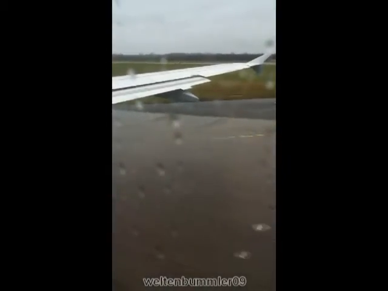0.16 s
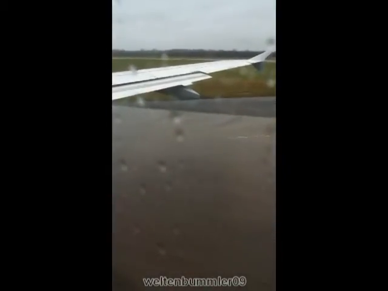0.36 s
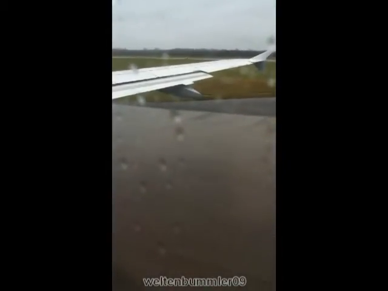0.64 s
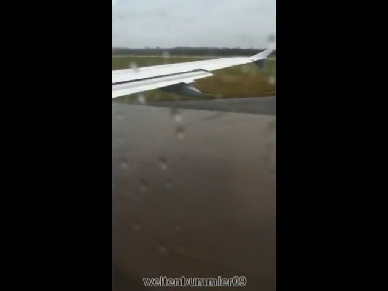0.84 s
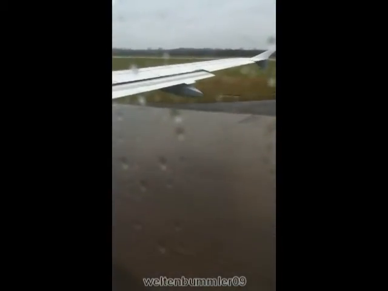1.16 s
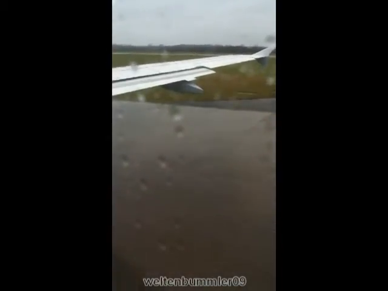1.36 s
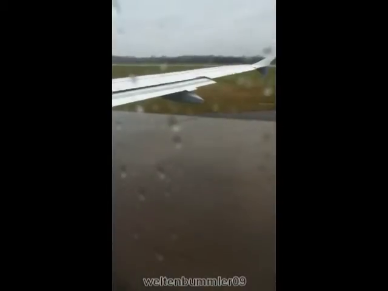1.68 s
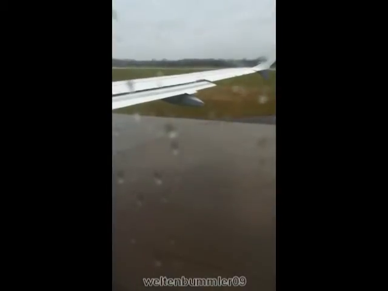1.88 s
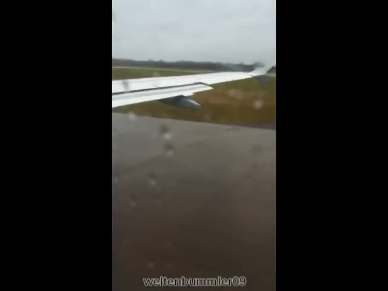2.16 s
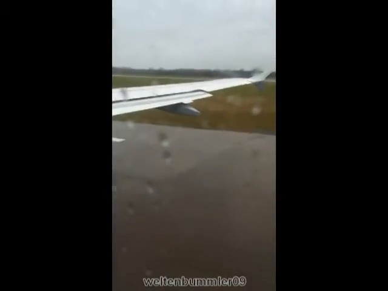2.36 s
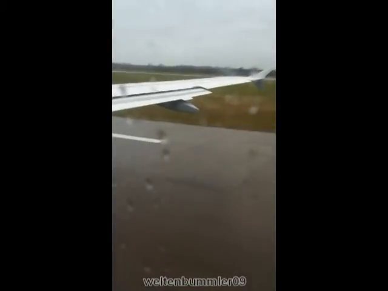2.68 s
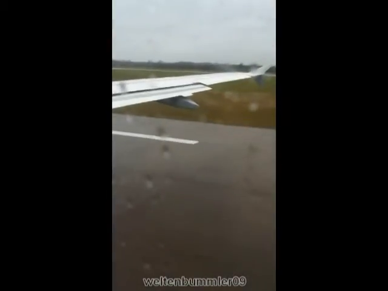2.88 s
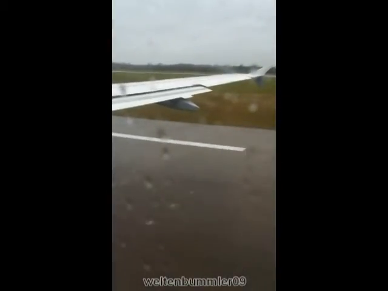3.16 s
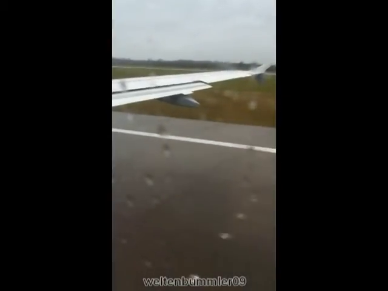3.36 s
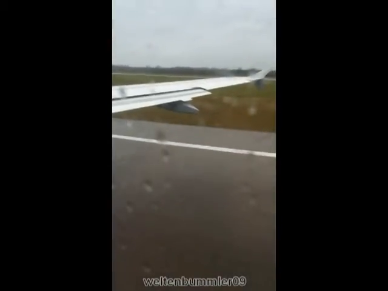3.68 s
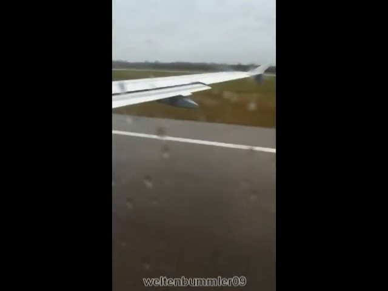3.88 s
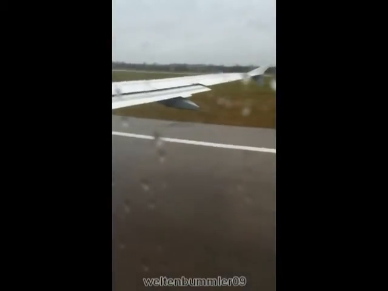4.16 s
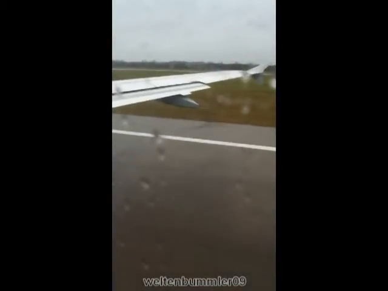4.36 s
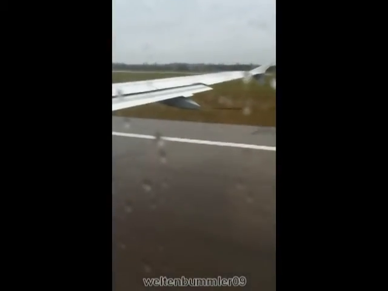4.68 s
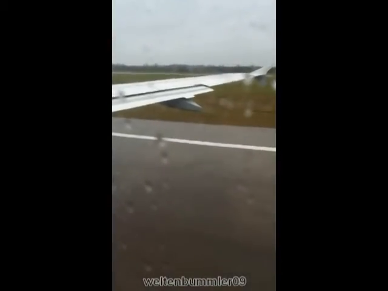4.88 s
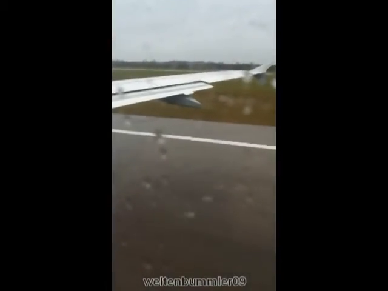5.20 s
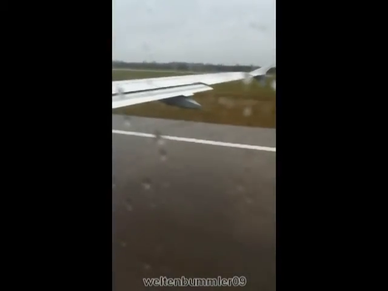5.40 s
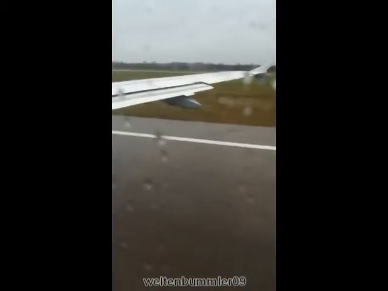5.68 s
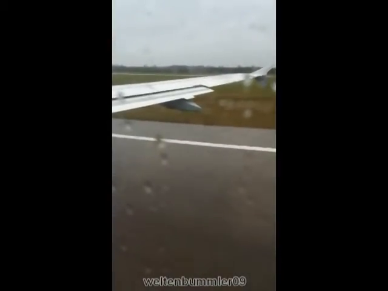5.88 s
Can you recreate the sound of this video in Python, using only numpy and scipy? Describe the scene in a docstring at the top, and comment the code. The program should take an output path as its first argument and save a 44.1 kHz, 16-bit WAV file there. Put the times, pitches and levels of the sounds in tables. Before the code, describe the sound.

Inside an airliner cabin, jet fans whine upward as a deep boom and roar build, then hold while wheels thud and trim rattles.

```python
"""An airliner starts its takeoff roll, heard at a window seat behind the wing.
At first a thin electrical whistle and vent air are clear around the idling fans.
The fans whine upward while boom, roar, air hiss and trim rattle rise for 1.3 seconds; scuffs join in.
From about two seconds wheel bumps thud and the trim ticks; the fans settle and the noise swells and sags.
Shaped noise makes the roar, boom and air, smeared tones the fans, steady tones the whistle."""
import sys
import numpy as np
from scipy import signal
from scipy.fft import rfft, irfft
from scipy.io import wavfile
from scipy.ndimage import uniform_filter1d, minimum_filter1d

SR = 44100
rng = np.random.default_rng(int(sys.argv[2]) if len(sys.argv) > 2 else 0)


def bounce(signal):
    """Save signal as a 16-bit WAV file at the path given by the first command-line argument."""
    frames = np.transpose(np.atleast_2d(signal))
    limited = np.clip(frames, -1, 1)
    pcm = np.round(limited * 32767).astype(np.int16)
    wavfile.write(sys.argv[1], SR, pcm)


N = 266364
TIME = np.arange(N) / SR  # s
BINS = np.maximum(np.arange(N // 2 + 1) * SR / N, 1)  # Hz

# slow swell and sag that several noise layers share: t/s, level change/dB
SWELL = [(1.0, 0), (1.7, 1.2), (1.95, -0.5), (2.3, -2), (2.55, -0.5), (3.0, 1.2), (3.35, -1.4), (3.7, 1.8),
         (3.95, 1), (4.3, -2), (4.6, -.2), (4.95, -1), (5.25, 0.5), (6.0, -1)]
# wheels passing over bumps: t/s, relative level/dB
BUMPS = [(2.13, -36), (3.123, -35), (3.898, -42), (4.01, -42), (4.816, -42), (5.483, -40), (5.841, -38)]


def undb(db):
    """Decibels to gain."""
    return 10 ** (np.asarray(db) / 20)


def curve(rows):
    """(s, value) rows joined by straight lines in time."""
    return np.interp(TIME, *np.transpose(rows))


def unit(x):
    """Scale to rms 1."""
    return x / np.sqrt(np.mean(x ** 2))


def colour(points):
    """Gain at every frequency from (Hz, dB) points; silent above the last one."""
    hz, db = np.transpose(points)
    gain = undb(np.interp(np.log(BINS), np.log(hz), db))
    return np.where(BINS <= hz[-1], gain, 0)


def resonance(hz, width):
    """Response of one damped resonance, gain 1 at its centre; both arguments in Hz."""
    return 1 / (1 + 1j * (BINS ** 2 - hz ** 2) / (BINS * width))


def filtered(x, response):
    """Pass a sound through a frequency response."""
    return irfft(rfft(x) * response, N)


def noise(response):
    """Random noise of rms 1 with the given response."""
    return unit(filtered(rng.standard_normal(N), response))


def even(x, seconds):
    """Take the slow swells out of a noise and keep its quick flutter."""
    size = max(int(seconds * SR), 2)
    power = uniform_filter1d(uniform_filter1d(x ** 2, size), size // 2)
    return x / np.sqrt(power + 1e-9)


def walk(rate):
    """Random wander of rms 1 that swings about rate times a second."""
    steps = 2 * rate * TIME
    knots = rng.standard_normal(int(steps[-1]) + 2)
    return unit(np.interp(steps, np.arange(len(knots)), knots))


def burst(start, rise_s, decay_s):
    """Envelope of a contact: a quick rise and an exponential fall."""
    age = np.maximum(TIME - start, 0)
    return (1 - np.exp(-age / rise_s)) * np.exp(-age / decay_s)


def opening_rise(start_db, swell=1.):
    """Gain that rises from start_db over the first 1.32 s, then levels off, plus a share of the swell."""
    rise_s = 1.32
    still_to_rise = np.clip(1 - TIME / rise_s, 0, 1)
    return undb(start_db * still_to_rise + swell * curve(SWELL))


def cabin_boom(db=-12, start_db=-6, throb_s=.17, loud_s=0.031):
    """The exhaust shakes the fuselage; the cabin air answers in low resonances that throb unevenly."""
    # resonances of the cabin air: f/Hz, width/Hz, relative level/dB
    cabin_modes = [(146, 39.4, -11.5), (160.8, 24, -7), (175.6, 14.8, -1.5), (207.1, 17.9, -5)]
    # moments when the boom's random throb is louder: t/s, lift/dB
    loud_moments = [(.68, 5), (1.13, 2), (1.4, 2), (1.85, 4), (2.119, 6.5), (2.86, 3), (2.98, 3.5),
                    (3.32, 5), (3.47, 6), (4.19, 6), (4.59, 5), (4.83, 4.5), (5.42, 2.5), (5.52, 6.5)]
    # the fourth power in energy: each resonance acts twice in a row
    power = sum(undb(mode_db) ** 2 * abs(resonance(hz, width)) ** 4 for hz, width, mode_db in cabin_modes)
    boom = even(noise(np.sqrt(power)), throb_s)
    throb_db = sum(lift_db * np.exp(-((TIME - peak) / loud_s) ** 2) for peak, lift_db in loud_moments)
    return boom * undb(db + throb_db) * opening_rise(start_db, swell=0.98)


def exhaust(db=-13.5, start_db=-9, flutter_s=0.23, buffet_db=1., buffet_hz=8):
    """Jet mixing noise arrives in buffets, dulled by the wall and lifted where its panels resonate."""
    # roar through the wall, before the panels lift it: f/Hz, relative level/dB per Hz
    roar_spectrum = [(60, -37), (120, -43), (190, -5), (235, 0.5), (300, -2.5), (375, -11.5), (460, -13.5),
                     (600, -22), (850, -30.5), (1200, -36), (1700, -41), (2600, -55), (6000, -74.5)]
    # wall panel resonances: f/Hz, width/Hz, lift/dB
    panel_modes = [(264.9, 16, 4.5), (337, 36.5, 6), (392.4, 14, 3.5), (456.6, 17, 5), (530, 80, 4.5),
                   (656, 12, 5), (724, 64, 2.5), (980, 34, 2), (1255, 35, 6.5)]
    lift_db = sum(mode_db * abs(resonance(hz, width)) ** 2 for hz, width, mode_db in panel_modes)
    roar = even(noise(colour(roar_spectrum) * undb(lift_db)), flutter_s)
    return roar * undb(db + buffet_db * walk(buffet_hz)) * opening_rise(start_db)


def fans(core_hz=14, haystack_hz=130, haystack_db=-4, db=-1):
    """Blade-passing tones; turbulent inflow smears each into a core and a skirt, more so for higher harmonics."""
    # fan spool-up: t/s, blade-passing f/Hz
    spool_up = [(0, 1550), (.4, 1580), (.85, 1732), (1.6, 2095), (2.15, 2370), (2.45, 2468), (3.2, 2560),
                (4.2, 2575), (6.04, 2578)]
    # harmonics from the first up, relative: idle level/dB, mid spool-up level/dB, takeoff level/dB
    harmonics = [(-59.5, -53.5, -56), (-56, -57.5, -67), (-69.5, -59.5, -67.5)]
    stage_hz = [1550, 2240, 2430]  # blade-passing rates of idle, mid spool-up and takeoff
    blade_hz = curve(spool_up)
    phase = 2 * np.pi * np.cumsum(blade_hz) / SR
    out = 0
    for k, stages_db in enumerate(harmonics, 1):
        # two independent wanders, for the cosine and the sine part
        inflow = []
        for _ in range(2):
            core = walk(k * core_hz)
            skirt = k * undb(haystack_db) * walk(k * haystack_hz)
            inflow.append(core + skirt)
        tone = inflow[0] * np.cos(k * phase) + inflow[1] * np.sin(k * phase)
        out = out + unit(tone) * undb(np.interp(blade_hz, stage_hz, stages_db))
    return out * undb(db)


def wheels(db=-28.0, start_db=-11, thud_hz=36, thud_s=0.013, thud_db=2):
    """Tyres rumble through the landing gear; each bump gives a short, deep thud."""
    # tyre rumble: f/Hz, relative level/dB per Hz
    roll_spectrum = [(15, -38.5), (30, -29.5), (48, -17.5), (62, -6), (80, 3.5), (104, 12.5), (125, 2),
                     (180, -30.5), (400, -54)]
    out = even(noise(colour(roll_spectrum)), 0.33) * undb(db) * opening_rise(start_db, swell=1.8)
    for start, bump_db in BUMPS:
        age = np.maximum(TIME - start, 0)
        swing = age / thud_s * np.exp(1 - age / thud_s)  # reaches 1 after thud_s
        out = out + undb(bump_db + thud_db) * swing * np.sin(2 * np.pi * thud_hz * age)
    return out


def rattle(rate=1100, decay_s=0.0019, db=-52, standstill_db=-16, awake_s=1.3, bunch_db=2.5, jolt=0.42,
           jolt_s=0.05):
    """Many small trim contacts a second, bunched by the shaking airframe; speed wakes them and bumps jolt them."""
    # bright chatter of the trim: f/Hz, relative level/dB per Hz
    rattle_spectrum = [(300, -23.5), (1000, -10), (2800, 7), (4300, 1.5), (5500, 2), (8000, -1),
                       (10500, -5.5), (13000, -14), (16000, -19)]
    sizes = undb(2.6 * np.minimum(rng.exponential(size=N), 4))
    hits = (rng.random(N) < rate / SR) * sizes
    # each contact leaves a short noisy ring
    energy = signal.lfilter([1], [1, -np.exp(-2 / (decay_s * SR))], hits ** 2)
    chatter = filtered(np.sqrt(energy) * rng.standard_normal(N), colour(rattle_spectrum))
    shaking_db = bunch_db * (walk(30) + walk(8))
    bunched = even(chatter * undb(shaking_db), .25)
    waking = np.clip(TIME / awake_s, 0, 1)
    jolts = 1 + jolt * sum(burst(start, .005, jolt_s) for start, _ in BUMPS)
    return bunched * jolts * undb(db + standstill_db * (1 - waking) + curve(SWELL))


def ticks(decay_s=0.0022, db=0.5):
    """A loose plastic panel knocks against its seat and rings in a few broad bright modes."""
    # sharp knocks: t/s, relative level/dB
    knocks = [(2.3371, -37), (2.39, -38), (2.6459, -39), (2.804, -36), (3.0515, -37), (3.228, -40),
              (3.3287, -33), (3.4155, -33.5), (3.6666, -36), (3.815, -37), (3.9005, -37), (4.0692, -37),
              (4.1829, -44), (4.3237, -38), (4.9696, -41), (5.4777, -34), (5.5485, -39)]
    # ringing of the plastic trim: f/Hz, width/Hz, relative level/dB
    trim_modes = [(3420, 1400, 4.5), (5170, 1400, 0), (7750, 820, 3.5), (9400, 900, -9.5),
                  (13000, 2000, -18)]
    blows = sum(undb(knock_db) * burst(start, .0002, decay_s) for start, knock_db in knocks)
    body = sum(undb(mode_db) ** 2 * abs(resonance(hz, width)) ** 2 for hz, width, mode_db in trim_modes)
    return blows * noise(np.sqrt(body)) * undb(db)


def scuffs(db=1, rise_s=.0012, decay_s=.013):
    """Surfaces slip briefly against each other with a bright hiss."""
    # short slips: t/s, relative level/dB
    slip_times = [(.9, -47), (1.23, -49), (1.351, -42), (1.757, -37), (2.07, -45), (2.157, -44),
                  (2.544, -39), (3.53, -47.5), (3.62, -44), (4.025, -46), (4.785, -48)]
    # hiss of a slip: f/Hz, relative level/dB per Hz
    scuff_spectrum = [(1500, -5), (4000, 6), (7000, -4), (9300, 5), (11500, -8.5), (16000, -9.5)]
    slips = sum(undb(slip_db) * burst(start, rise_s, decay_s) for start, slip_db in slip_times)
    return slips * noise(colour(scuff_spectrum)) * undb(db)


def slipstream(db=-35, growth_db_per_s=3):
    """Airflow round the fuselage: a mid-range rush that grows as the aircraft gathers speed."""
    # rush along the fuselage: f/Hz, relative level/dB per Hz
    slipstream_spectrum = [(200, -6), (450, 0), (700, 3), (900, -11), (1300, -14.5), (2500, -30)]
    # db applies at the end, before the swell
    growth_db = growth_db_per_s * (TIME - TIME[-1])
    return noise(colour(slipstream_spectrum)) * undb(db + growth_db + curve(SWELL))


def air(db=-47, start_db=-2.5, vent_db=-31):
    """Hiss of air along the skin, over the steady rush of the cabin vents."""
    # hiss along the skin: f/Hz, relative level/dB per Hz
    air_spectrum = [(800, -13.5), (1700, 4), (2250, 4), (2680, 5.5), (2950, 0.5), (3250, 3), (3800, 0.5),
                    (4250, -5), (5500, -7.5), (8000, -8.5), (10500, -13.5), (13000, -19), (16000, -26)]
    # cabin vents: f/Hz, relative level/dB per Hz
    vent_spectrum = [(40, -36), (110, -13.5), (180, 10), (330, 5.5), (450, -6.5), (680, -1.5), (820, -13.5),
                     (980, -4), (1150, -13.5), (2000, -24.5), (4000, -48)]
    hiss = noise(colour(air_spectrum)) * undb(db) * opening_rise(start_db, swell=1.3)
    vents = noise(colour(vent_spectrum)) * undb(vent_db)
    return hiss + vents


def whistle(supply_hz=400.56):
    """Thin electrical whistles on harmonics of one supply; they waver, and sink between 1.1 and 2.2 s."""
    # whistle lines: multiple of the supply frequency, rms level/dB before the waver and the fade
    lines = [(12, -73), (14, -74), (16, -69), (20, -75), (22, -73), (28, -80), (30, -80), (32, -72),
             (34, -80), (38, -82)]
    out = 0
    for k, line_db in lines:
        tone = np.sin(2 * np.pi * (k * supply_hz * TIME + rng.random()))
        out = out + undb(line_db + walk(3)) * tone
    fade_db = np.interp(TIME, [1.1, 2.2], [0, -6])
    return np.sqrt(2) * out * undb(fade_db)  # root two turns rms into sine peak


def scene():
    """Everything that reaches the window seat, as one channel."""
    engines = cabin_boom() + exhaust() + fans()
    airflow = air() + slipstream()
    runway_and_trim = wheels() + rattle() + ticks() + scuffs()
    return (engines + airflow + runway_and_trim + whistle())[None]


def record(dry):
    """At the microphone a look-ahead limiter holds peaks at full scale, then a steep low-pass cuts the top."""
    top_hz = 15600
    size = SR // 100  # 10 ms
    headroom = 1 / np.maximum(abs(dry), 1)
    lowest = minimum_filter1d(headroom, 2 * size)
    gain = uniform_filter1d(uniform_filter1d(lowest, size), size)
    low_pass = signal.ellip(12, .1, 80, top_hz, fs=SR, output="sos")
    return signal.sosfilt(low_pass, dry * gain)


dry = scene()
out = record(dry)
bounce(out)
```